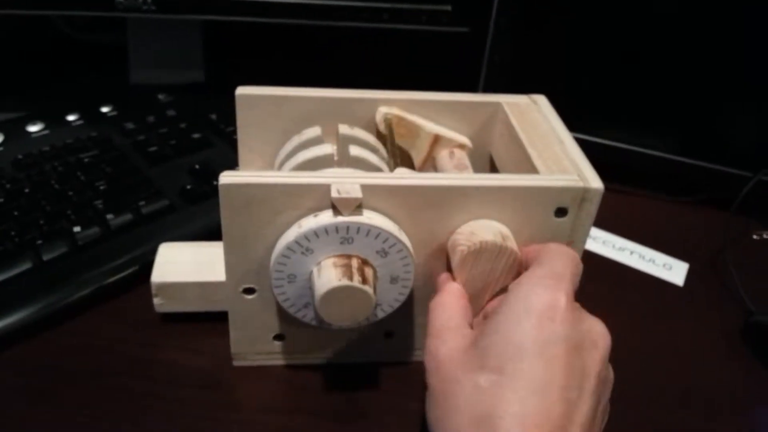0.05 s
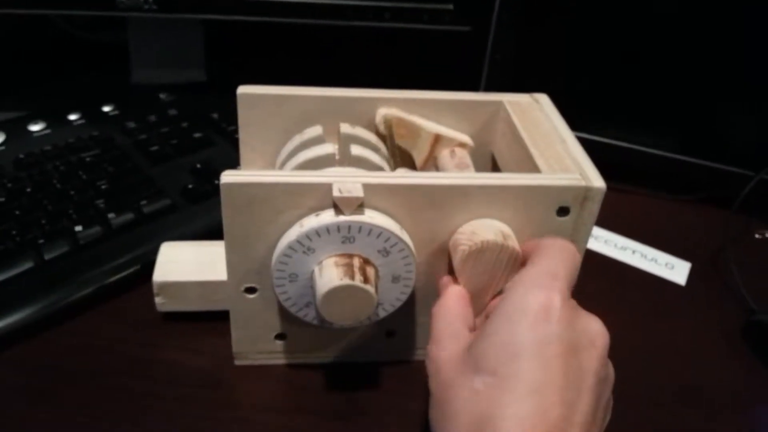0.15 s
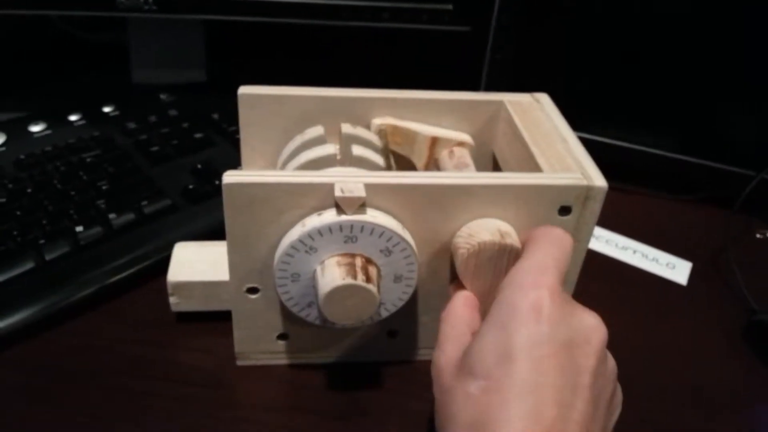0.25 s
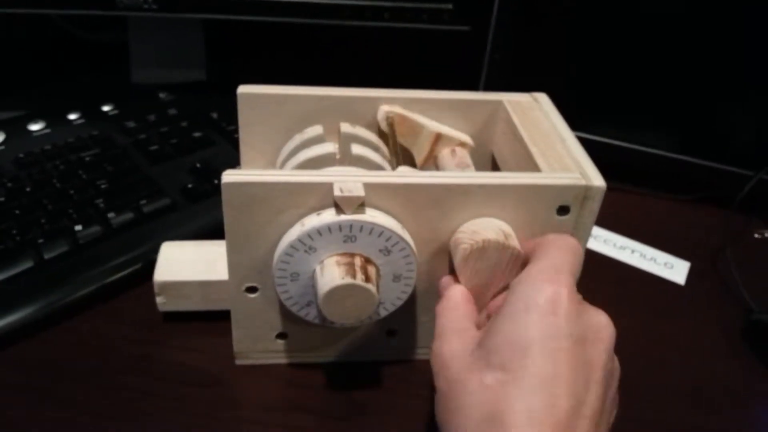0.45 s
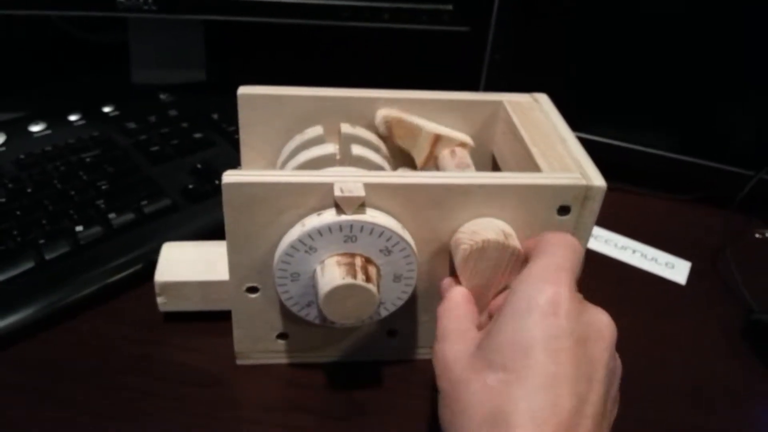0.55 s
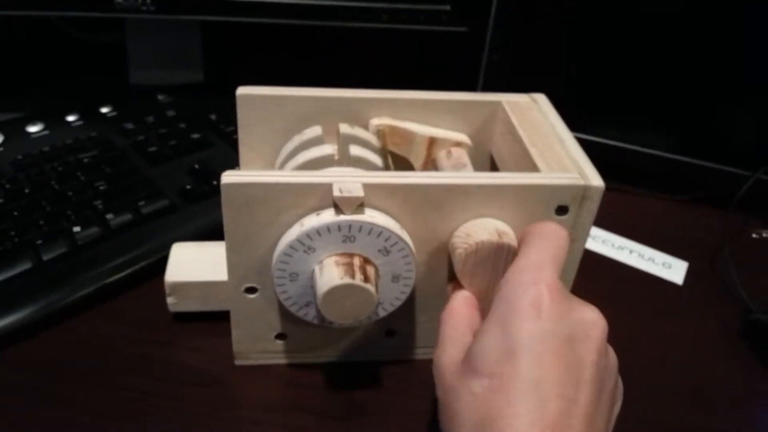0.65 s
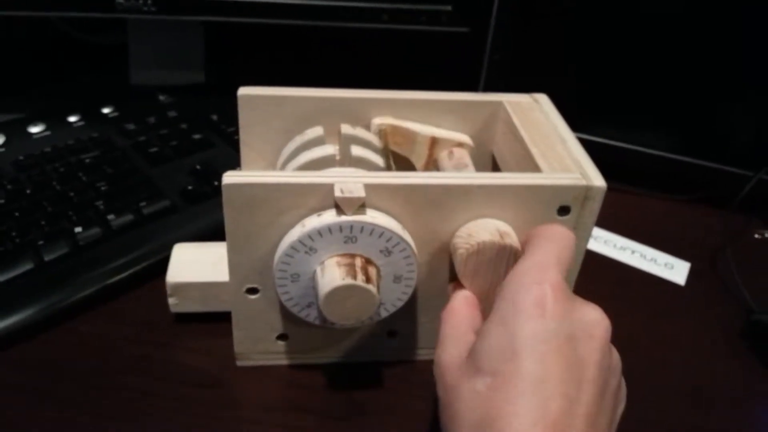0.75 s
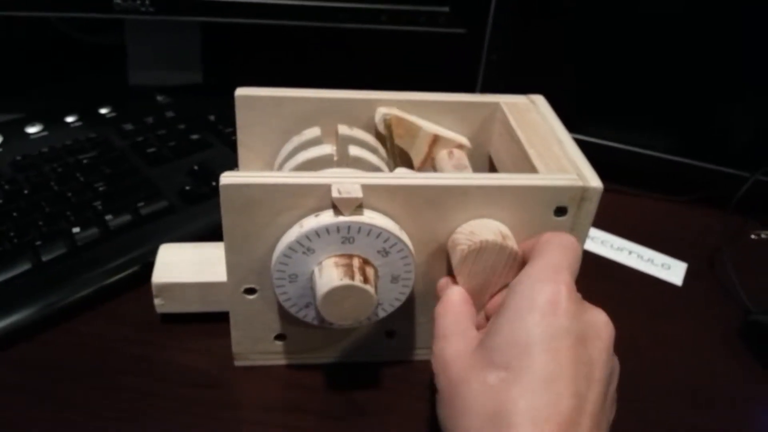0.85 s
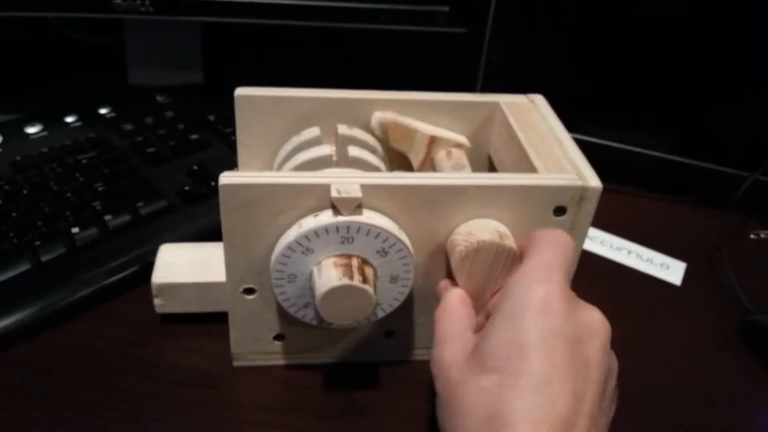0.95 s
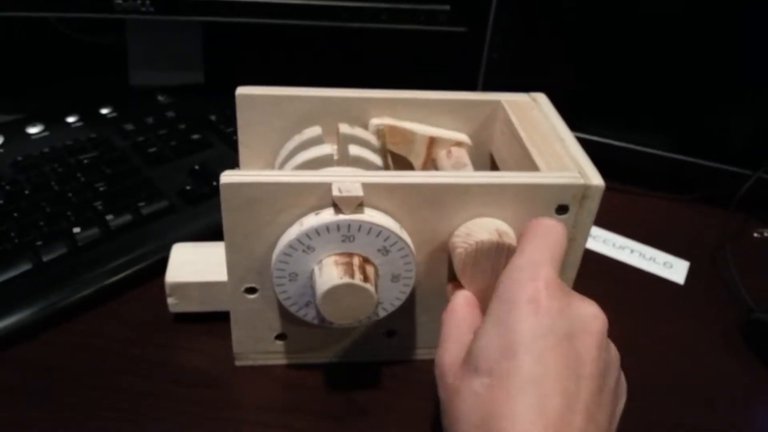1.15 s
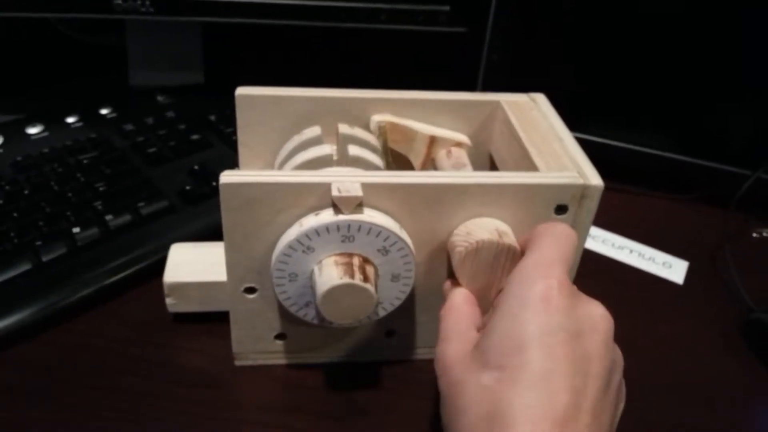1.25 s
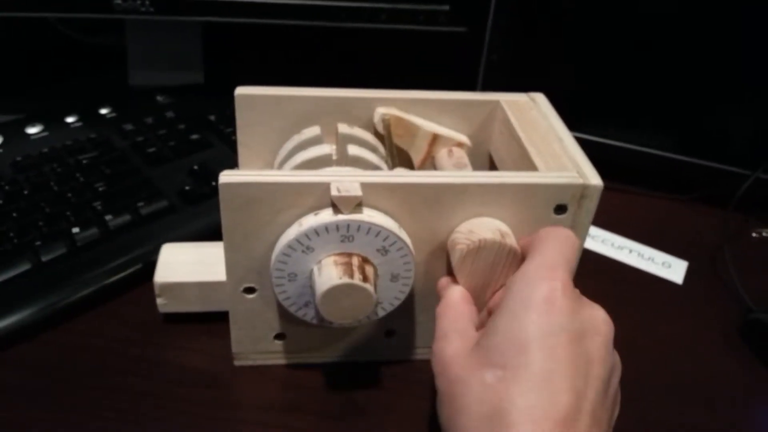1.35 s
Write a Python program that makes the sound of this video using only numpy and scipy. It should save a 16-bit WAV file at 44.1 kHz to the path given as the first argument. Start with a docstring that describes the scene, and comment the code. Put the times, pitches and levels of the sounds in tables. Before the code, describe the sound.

A small wooden lock clacks sharply three times in quick succession, each a lever click followed by a hollow bolt slam. Softer knocks and faint rubbing follow as the knob turns back, close to the microphone in a quiet room.

```python
"""A small plywood combination lock is turned three times on a desk, close to the microphone.
Each turn snaps a lever off its catch, then the bolt taps and slams against the hollow case.
Turning the knob back gives faint rubbing and softer knocks. Each hit is a few clear tones plus a
burst of noise, the ring of the wood. A small quiet room answers, and loud clacks overload the recorder."""
import sys
import numpy as np
from scipy import signal
from scipy.fft import rfft, irfft, next_fast_len
from scipy.io import wavfile

SR = 44100
rng = np.random.default_rng(int(sys.argv[2]) if len(sys.argv) > 2 else 0)


def pcm_store(signal):
    """Save signal as 16-bit PCM."""
    levels = np.round(np.clip(np.atleast_2d(signal), -1, 1) * 32767)
    wavfile.write(sys.argv[1], SR, levels.astype(np.int16).T)


N = 61739
HIT_SAMPLES, ROOM_SAMPLES = 8192, 18000

# how alike left and right are, for hits and echo (pitch [Hz], likeness [0 to 1])
HIT_LIKENESS = [(100, .95), (500, .88), (1200, .45), (3000, .1), (10000, 0)]
# the same for background and rubbing (pitch [Hz], likeness [0 to 1])
QUIET_LIKENESS = [(100, .9), (600, .85), (2000, .4), (8000, .1)]


def gain(db):
    """Turn decibels into a multiplier."""
    return 10 ** (np.asarray(db) / 20)


def normalize(x):
    """Scale a sound to an average power of 1."""
    return x / np.sqrt(np.mean(x ** 2) + 1e-20)


def curve_at(points, hz):
    """Read between (pitch, value) points, with octaves evenly spaced."""
    pitches, values = np.transpose(points)
    return np.interp(np.log(hz + 1), np.log(pitches + 1), values)


def pan(left_db):
    """Two gains that make the left side left_db louder than the right."""
    return gain(np.array([[left_db], [-left_db]]) / 2)


def stereo_noise(spectrum, likeness, size):
    """Shaped noise: one part is shared by both sides, the other is opposite."""
    hz = np.fft.rfftfreq(size, 1 / SR)
    angle = np.arccos(np.clip(curve_at(likeness, hz), -1, 1)) / 2
    shaped = rfft(rng.standard_normal((2, size))) * gain(curve_at(spectrum, hz))
    shared, opposite = irfft(shaped * [np.cos(angle), np.sin(angle)], size)
    return np.array([shared + opposite, shared - opposite])


def lean_left(x):
    """Middle pitches reach the left microphone more strongly."""
    # balance (pitch [Hz], left minus right [dB])
    balance = [(400, -1), (800, 1.5), (1300, 4), (2200, 6), (3000, 4), (4000, -2), (7000, -1), (11000, 3)]
    left_db = curve_at(balance, np.fft.rfftfreq(x.shape[1], 1 / SR))
    return irfft(rfft(x) * gain(np.array([left_db, -left_db]) / 2))


def shape_octaves(x, envelope):
    """Give each octave its own loudness over time, envelope(hz)."""
    centres = 1000 * 2. ** np.arange(-3, 5)
    hz, spectrum = np.fft.rfftfreq(x.shape[1], 1 / SR), rfft(x)
    return sum(irfft(spectrum * curve_at(np.c_[centres, band], hz)) * envelope(centre)
               for centre, band in zip(centres, np.eye(len(centres))))


def fade(t, rise_s, hold_s, ring_s):
    """Rise, hold, then die away by 60 dB in ring_s seconds."""
    return (1 - np.exp(-t / rise_s)) * np.exp(-np.log(1000) * np.maximum(t - hold_s, 0) / ring_s)


def hit(tones, wood, grain, shape, bright_db):
    """One contact rings a few clear tones over the noisy ring of the wood."""
    # tones: (pitch [Hz], level [dB], ring [s], left minus right [dB])
    # wood: (pitch [Hz], level [dB])
    # shape: (wood [dB], rise [s], hold [s], ring at 1 kHz [s], left minus right [dB], echo [dB])
    wood_db, rise_s, hold_s, wood_ring_s, left_db, echo_db = shape
    fresh_share, scatter_db = .35, 1  # no two hits are quite the same
    damping, right_lag_rad_per_khz = .3, .45  # damping makes high pitches die sooner
    t = np.arange(HIT_SAMPLES) / SR

    def tilt(hz):
        return gain(bright_db * np.log2(hz / 2000))

    def wood_fade(hz):
        return tilt(hz) * fade(t, rise_s, hold_s, wood_ring_s * (hz / 1000) ** -damping)

    fresh = normalize(stereo_noise(wood, HIT_LIKENESS, HIT_SAMPLES))
    wood_noise = lean_left(np.sqrt(1 - fresh_share) * grain + np.sqrt(fresh_share) * fresh)
    sound = gain(wood_db) * pan(left_db) * shape_octaves(wood_noise, wood_fade)
    for hz, db, ring_s, tone_left_db in tones:
        phase = rng.uniform(0, 2 * np.pi) - np.array([[0], [right_lag_rad_per_khz * hz / 1000]])
        level = gain(db + rng.normal(0, scatter_db)) * tilt(hz) * pan(tone_left_db)
        envelope = fade(t, max(rise_s, .5 / hz), hold_s, ring_s)
        sound += level * envelope * np.sin(2 * np.pi * hz * t + phase)
    return np.pad(sound, ((0, 0), (0, ROOM_SAMPLES - 1))) + gain(echo_db) * room_echo(sound)


def wooden_part(hits, wood, shape):
    """All hits on one part share its grain, the part's own unchanging ring."""
    track = np.zeros((2, N))
    grain = normalize(stereo_noise(wood, HIT_LIKENESS, HIT_SAMPLES))
    for time_s, db, bright_db, tones in hits:
        sound = gain(db) * hit(tones, wood, grain, shape, bright_db)
        start = round(time_s * SR)
        track[:, start:start + sound.shape[1]] += sound[:, :N - start]
    return track


def background():
    """The quiet room has a steady, low noise."""
    # noise colour (pitch [Hz], level [dB])
    colour = [(25, -17), (50, -16), (80, -4), (115, 3), (160, -4), (240, 0), (620, -3), (850, -13),
              (2200, -17), (3800, -22), (5500, -28), (14000, -30)]
    return gain(-48) * normalize(stereo_noise(colour, QUIET_LIKENESS, N))


def lever():
    """The small lever snaps off its catch with a high, nearly pitched click."""
    # snaps (time [s], level [dB])
    snaps = [(.2274, -2.5), (.6207, -.5), (1.0098, 1)]
    # how the lever rings; columns as in hit()
    tones = [(330, -26, .07, 0), (2120, -23, .035, 9), (2365, -17, .035, 9), (2745, -17, .02, 8),
             (2855, -4, .022, 9), (2862, -26, .12, 5), (3370, -18, .025, 5), (3650, -18, .035, -2),
             (3850, -16, .035, -2)]
    wood = [(40, -44), (100, -28), (250, -9), (700, -11), (1500, -7), (2600, -2), (3700, 0), (4400, -9),
            (5800, -9), (8000, -14), (11500, -19), (15000, -32)]
    shape = (-11.5, .0003, .003, .026, 2, 2.5)
    return wooden_part([(time_s, db, 0, tones) for time_s, db in snaps], wood, shape)


def room_echo(x):
    """The small room answers each hit with a short, smooth echo."""
    # echo length (pitch [Hz], ring [s])
    ring_times = [(100, .38), (400, .33), (1000, .26), (3500, .245), (8000, .245), (14000, .15)]
    # echo colour (pitch [Hz], level [dB])
    colour = [(60, -10), (115, -1), (160, -9), (220, -4), (400, -6), (620, -8), (760, -11), (1100, -9),
              (1800, -11.5), (2800, -14), (3900, -7.5), (5500, -11), (9000, -8.5), (14000, -20)]
    t = np.arange(ROOM_SAMPLES) / SR

    def decay(hz):
        envelope = fade(t, rise_s=.006, hold_s=0, ring_s=curve_at(ring_times, hz))
        return envelope / np.sqrt(np.sum(envelope ** 2))

    tail = shape_octaves(lean_left(stereo_noise(colour, HIT_LIKENESS, ROOM_SAMPLES)), decay)
    return signal.fftconvolve(x.mean(axis=0)[None], tail, axes=1)


def bolt():
    """The bolt taps, then slams home and rings the whole hollow case."""
    # taps and slams (time [s], level [dB], brightness [dB per octave])
    taps = [(.2712, -2.5, -1.5), (.6597, -1.5, -.2), (1.0459, 0, .8)]
    slams = [(.2799, 0, 0), (.6668, 0, 0), (1.0524, 0, .6)]
    # how the bolt and the case ring; columns as in hit()
    bolt_tones = [(760, -20, .025, 2), (1420, -19, .02, 5), (2160, -11, .025, 6), (2420, -8, .025, 6),
                  (3270, -8, .018, 3)]
    bolt_wood = [(40, -32), (120, -16), (400, -12), (900, -4), (2000, -3), (3300, 0), (4200, -8),
                 (5600, -10), (8000, -19), (15000, -32)]
    bolt_shape = (-9, .0005, .0025, .018, 2, 1)
    case_tones = [(115, -33, .22, 0), (250, -27, .1, -2), (333, -20.5, .1, -3), (400, -20.5, .06, -2),
                  (500, -24, .05, 0), (655, -28, .1, 0), (730, -8, .055, 1), (848, -23, .05, 5),
                  (1107, -20, .08, 8), (1862, -11, .035, 9), (1980, -12.5, .04, 9), (2370, -18, .06, 8),
                  (3790, -11.5, .03, -5), (6580, -17, .05, -3)]
    case_wood = [(40, -40), (150, -19), (350, -3), (800, -2), (1400, -1.5), (3600, -1), (4500, -8),
                 (5600, -8), (6800, -5), (10000, -16), (15000, -33)]
    case_shape = (-4.8, .0003, .0028, .036, 1.2, .5)
    tapping = wooden_part([(*tap, bolt_tones) for tap in taps], bolt_wood, bolt_shape)
    slamming = wooden_part([(*slam, case_tones) for slam in slams], case_wood, case_shape)
    return tapping + slamming


def rubbing():
    """Wood slides on wood, swelling and fading each time the knob turns back."""
    # slides (start [s], end [s], level [dB])
    slides = [(.39, .61, -46), (.78, 1.0, -46), (1.24, 1.42, -48)]
    # rubbing colour (pitch [Hz], level [dB])
    colour = [(60, -20), (150, -8), (330, 0), (700, -2), (1500, -12), (3500, -16), (6000, -28),
              (15000, -45)]
    t, level = np.arange(N) / SR, np.zeros(N)
    for start, end, db in slides:
        progress = np.clip((t - start) / (end - start), 0, 1)
        level += gain(db) * np.sqrt(np.abs(np.sin(np.pi * progress)))
    return level * normalize(stereo_noise(colour, QUIET_LIKENESS, N))


def knocks():
    """On the way back a loose part knocks, then the knob meets its stop with a fuller thud."""
    # hits (time [s], level [dB], brightness [dB per octave], extra tone [Hz], its level [dB])
    loose_hits = [(.4333, 0, -1.3, 1540, -22), (.8340, -.5, 1.3, 2330, -21), (1.2875, -9, 0, 1480, -19)]
    stop_hits = [(.5036, -6.5, -1.6, 2100, -21), (.8893, .5, .2, 1620, -15.5)]
    # how the loose parts and the stop ring; columns as in hit()
    loose_tones = [(335, -38, .07, -1), (700, -23, .03, 2), (830, -27, .03, 5), (1100, -29, .025, 8),
                   (2290, -28, .025, 8), (3330, -29, .025, 6)]
    loose_shape = (-21, .0009, .004, .032, 4, 2.5)
    stop_tones = [(195, -31, .08, 0), (345, -24, .07, -1), (470, -28, .05, 0), (705, -22, .04, 2),
                  (1130, -21, .02, 8), (3850, -29, .035, -2)]
    stop_shape = (-17.5, .0006, .003, .042, 4, 1)
    wood = [(50, -32), (300, -11), (700, -3), (1600, 0), (3500, -4), (4400, -19), (5700, -20), (8000, -33),
            (15000, -52)]
    extra_ring_s, extra_left_db = .012, 8

    def play(rows, tones, shape):
        hits = [(time_s, db, bright_db, tones + [(hz, extra_db, extra_ring_s, extra_left_db)])
                for time_s, db, bright_db, hz, extra_db in rows]
        return wooden_part(hits, wood, shape)

    return play(loose_hits, loose_tones, loose_shape) + play(stop_hits, stop_tones, stop_shape)


def scene():
    """The lock over the steady background of the room."""
    return lever() + bolt() + knocks() + rubbing() + background()


def record(dry):
    """The recorder squashes the loudest peaks and drops the deep bass and the highest treble."""
    ceiling, hardness = .92, 6
    low_cut_hz, high_cut_hz, steepness = 70, 15000, 60
    clipped = dry / (1 + np.abs(dry / ceiling) ** hardness) ** (1 / hardness)
    thinned = signal.sosfilt(signal.butter(2, low_cut_hz, "high", fs=SR, output="sos"), clipped)
    size = next_fast_len(N + SR // 2)
    treble_cut = 1 / (1 + (np.fft.rfftfreq(size, 1 / SR) / high_cut_hz) ** steepness)
    return irfft(rfft(thinned, size) * treble_cut, size)[:, :N]


dry = scene()
out = record(dry)
pcm_store(out)
```